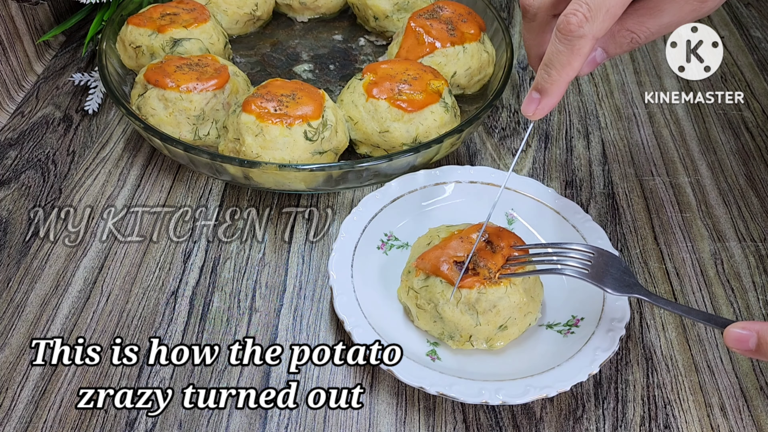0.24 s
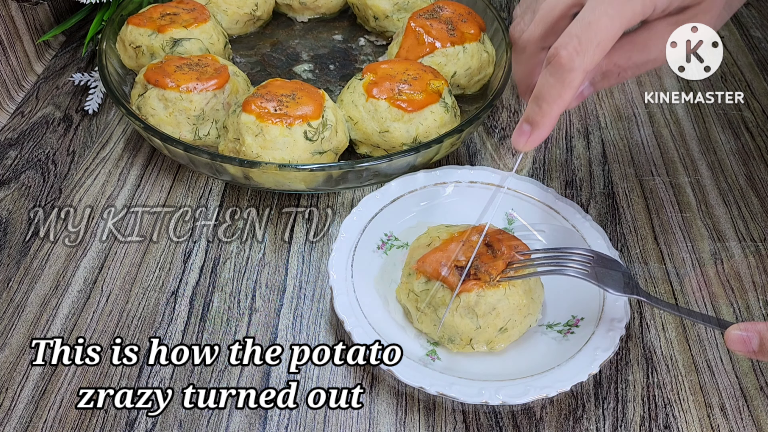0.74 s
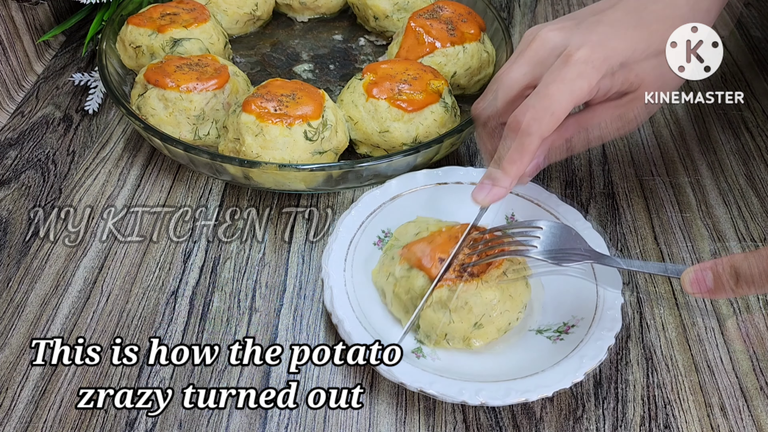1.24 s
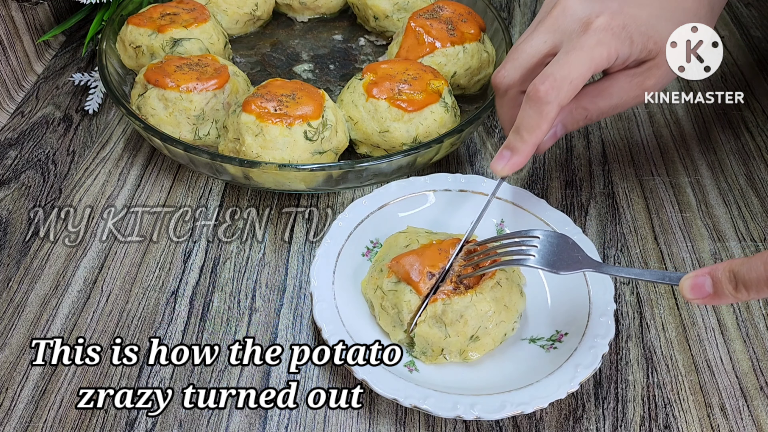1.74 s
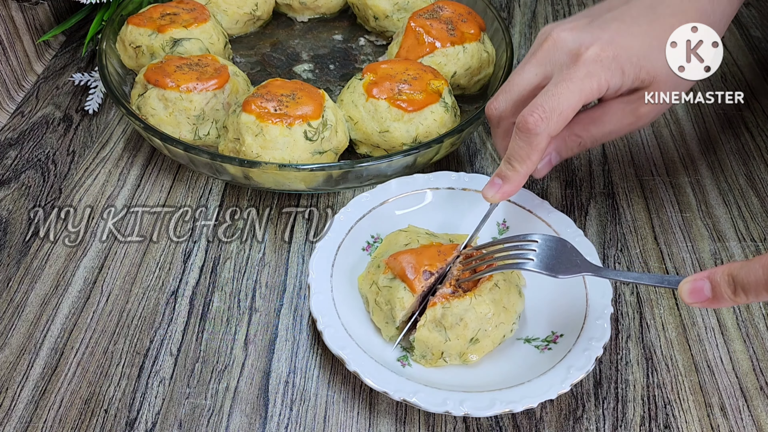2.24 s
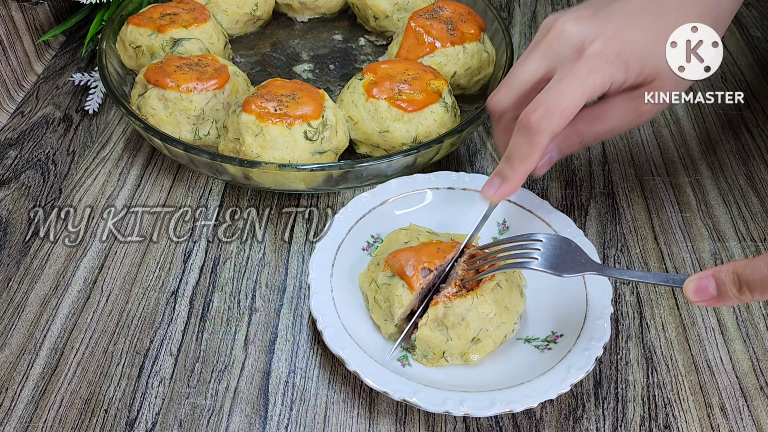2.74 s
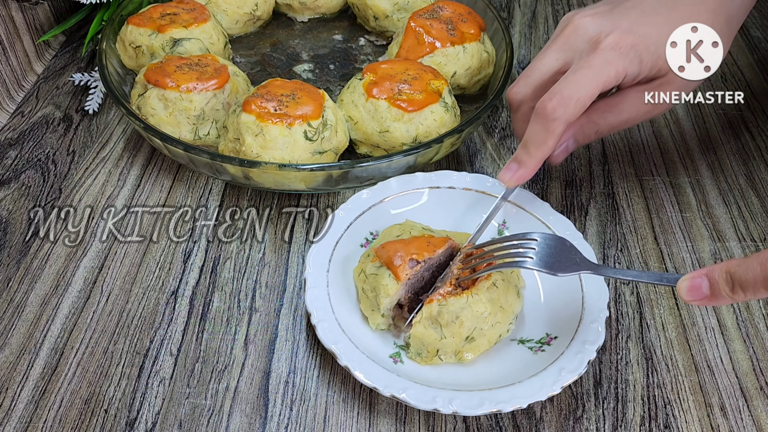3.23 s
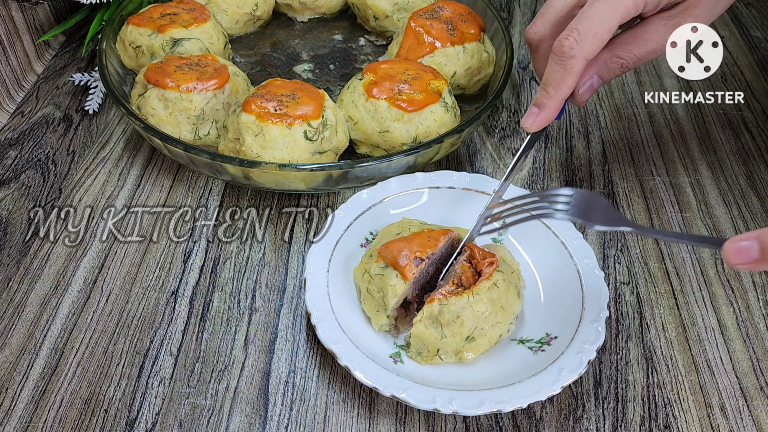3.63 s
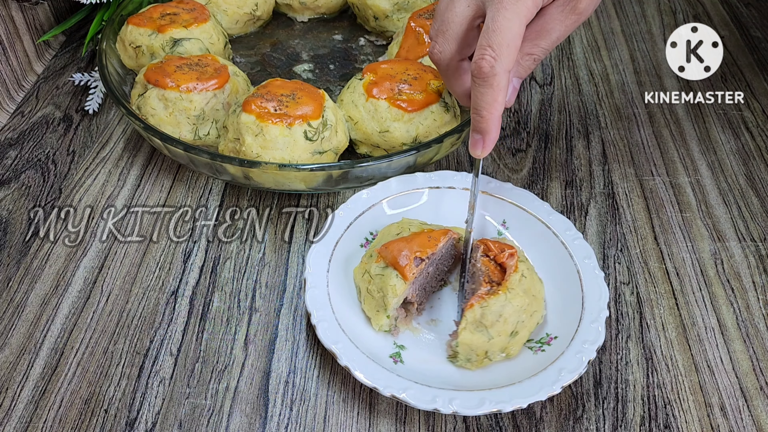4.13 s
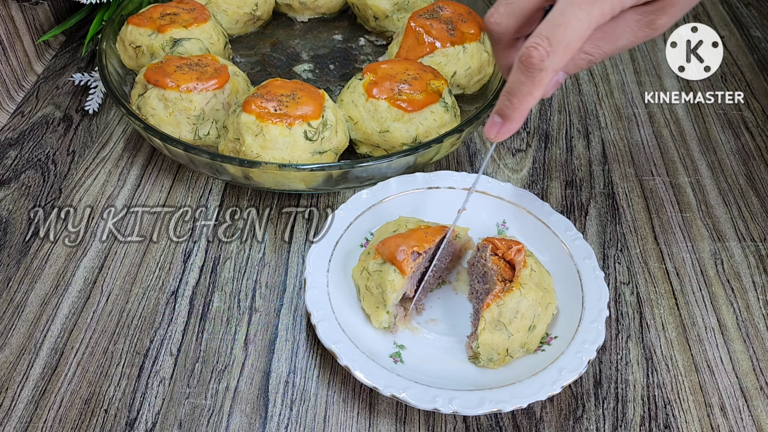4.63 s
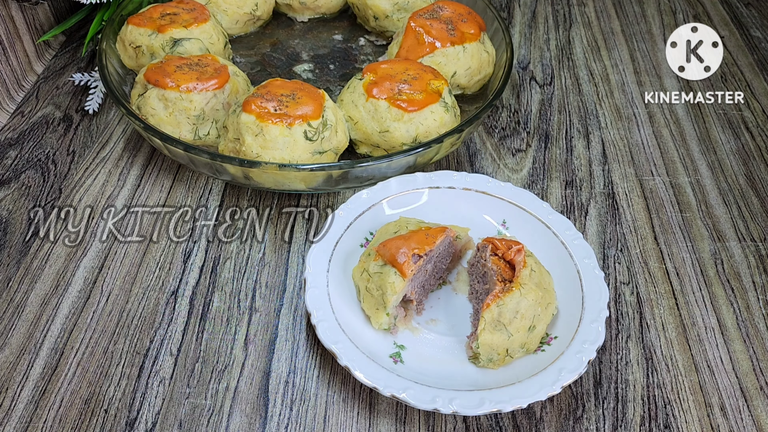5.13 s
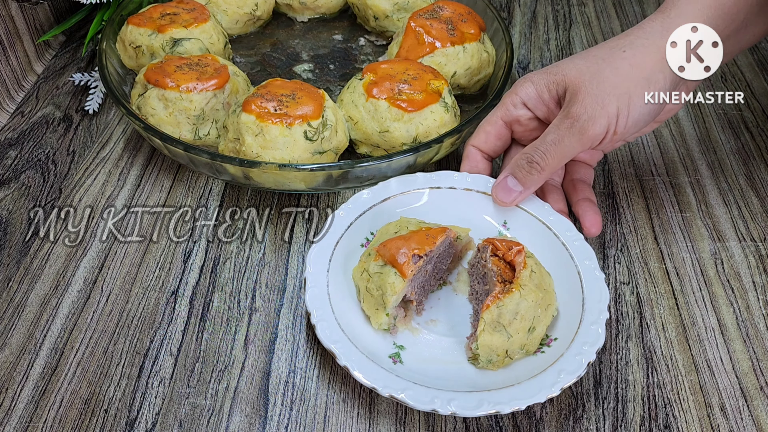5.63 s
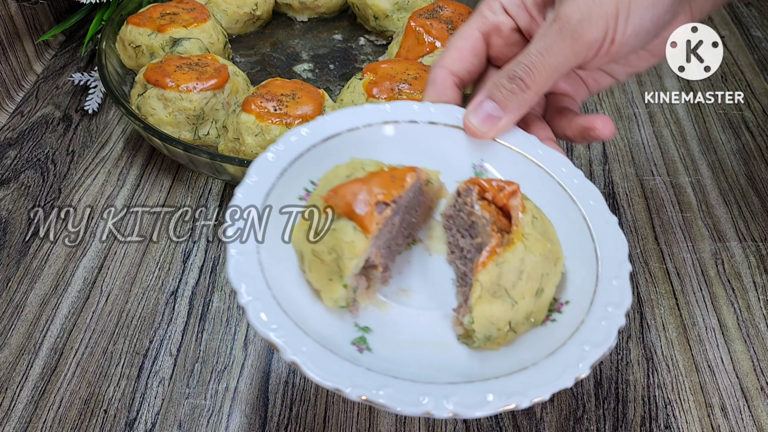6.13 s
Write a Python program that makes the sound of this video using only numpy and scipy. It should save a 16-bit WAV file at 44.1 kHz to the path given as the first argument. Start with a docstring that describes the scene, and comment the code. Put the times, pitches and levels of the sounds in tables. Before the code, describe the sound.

Light sawing grows into gritty scrapes and sharp cutlery clatter on a china plate, then fades to soft rustling and dull bumps over faint hum.

```python
"""In a kitchen, a serrated knife saws through a soft dumpling on a porcelain plate while a fork holds it.
The blade strikes with noise bursts and ringing modes, and skids as grit noise chattering with its teeth.
The plate's foot grinds through a moving resonance and knocks on a hollow table, driven by random jolts.
A low hum wavers in the room noise; at the end a hand pulls the plate away with a soft rustle and dull bumps.
Two spaced microphones listen from above."""
import sys
import numpy as np
from scipy import signal
from scipy.fft import rfft, irfft
from scipy.io import wavfile
from scipy.ndimage import uniform_filter1d

SR = 44100
rng = np.random.default_rng(int(sys.argv[2]) if len(sys.argv) > 2 else 0)


def log_audio(samples):
    """Write samples as a 16-bit WAV file to the path given in sys.argv[1]."""
    # one column per channel
    frames = np.atleast_2d(samples).T
    # limit to full scale, then quantise
    limited = np.clip(frames, -1, 1)
    pcm = np.round(limited * 32767).astype(np.int16)
    wavfile.write(sys.argv[1], SR, pcm)


def gain_from_db(level_db):
    """Convert decibel levels to linear amplitude factors (20 dB per decade)."""
    decades = np.asarray(level_db, float) / 20
    return 10 ** decades


N = 280917  # length in samples
TIME = np.arange(N) / SR  # [s]
RING_TIME = np.arange(SR // 5) / SR  # [s]


def evened(x):
    """Scales to rms 1."""
    return x / np.sqrt(np.mean(x ** 2) + 1e-20)


def read(points, hz):
    """Reads a table on a log-frequency axis."""
    f, value = np.transpose(points)
    return np.interp(np.log(hz + 1), np.log(f + 1), value)


def colour(x, points):
    """Shapes a sound by a spectrum in dB."""
    hz = np.fft.rfftfreq(x.shape[-1], 1 / SR)
    return irfft(rfft(x) * gain_from_db(read(points, hz)), x.shape[-1])


def halves(x):
    """Splits a sound into its lower and upper part, each of rms 1."""
    low = colour(x, [(4200, 0), (6000, -6), (9000, -30)])
    return evened(low), evened(x - low)


def add(mix, s, sound):
    """Mixes a sound in at a time in seconds."""
    part = mix[round(s * SR):][:len(sound)]
    part += sound[:len(part)]


def ring(modes, flutter=0):
    """Decaying sines; fingers and food touching the body make each mode wander in phase and strength."""
    steps = rng.standard_normal((2, len(modes), len(RING_TIME) // 64 + 1))
    wander = np.cumsum(steps, 2).repeat(64, 2)[..., :len(RING_TIME)]
    wander = flutter * uniform_filter1d(wander, 128)
    out = 0
    for (hz, db, t60), swell_db, slip in zip(modes, *wander):
        fade = gain_from_db(db - 60 * RING_TIME / t60 + swell_db)
        out = out + fade * np.sin(2 * np.pi * hz * RING_TIME + slip)
    return out


# uneven waking of the modes, since each blow lands elsewhere [dB, standard deviation]
STRUCK_SPREAD_DB = 4


def struck(modes, flutter):
    """The modes of a body, each a little stronger or weaker for this blow."""
    shifts_db = STRUCK_SPREAD_DB * rng.uniform(-np.sqrt(3), np.sqrt(3), len(modes))
    shifted = [(hz, db + shift_db, t60) for (hz, db, t60), shift_db in zip(modes, shifts_db)]
    return ring(shifted, flutter)


def resonate(x, hz, width):
    """Shifts the curve hz down to zero, smooths, and shifts back: a moving resonance of rms 1."""
    turn = np.exp(2j * np.pi * np.cumsum(hz) / SR)
    r = np.exp(-np.pi * width / SR)
    return evened((turn * signal.lfilter([1], [1, -r], x / turn)).real)


def banded(x, depth_db):
    """As the point of contact travels, narrow bands of the sound swell and sink."""
    z = signal.stft(x, nperseg=512, noverlap=384)[2]
    bands = rng.standard_normal(z.T.shape).T
    bands = evened(uniform_filter1d(uniform_filter1d(bands, 4, 0), 30, 1))
    return evened(signal.istft(z * gain_from_db(depth_db * bands), nperseg=512, noverlap=384)[1][:N])


# spectrum of the room noise: (frequency [Hz], relative level [dB]), and its overall level
AIR = [(15, -42.5), (25, -13), (59, 0), (84, -9), (120, -20.5), (190, -13), (301, -12), (394, -26),
       (695, -41), (911, -26), (1610, -27), (3920, -41), (6380, -47), (11600, -42.5), (16000, -57.5)]
AIR_DB = -63.5
# left-right likeness of the room noise: (frequency [Hz], correlation)
SAME = [(60, 0.68), (240, 0.51), (950, -0.16), (3770, -0.54), (15000, -0.01)]
# low hum: (frequency [Hz], width of its wavering [Hz], level [dB])
HUM = [(69, 5, -62)]


def air():
    """Room air and microphone hiss in faint patches, with a wavering low hum."""
    frames, hz = N // 512 + 5, np.fft.rfftfreq(2048, 1 / SR)
    a, b, c, d, patches = rng.standard_normal((frames, 1025, 5)).T
    patches = evened(uniform_filter1d(uniform_filter1d(patches, 30, 0), 8, 1))
    same = np.clip(read(SAME, hz), -1, 1)[:, None]
    left = a + 1j * b
    right = same * left + np.sqrt(1 - same ** 2) * (c + 1j * d)
    z = np.array([left, right]) * gain_from_db(read(AIR, hz)[:, None] + 2.2 * patches)
    out = gain_from_db(AIR_DB) * evened(signal.istft(z, nperseg=2048, noverlap=1536)[1][:, :N])
    for f, width, db in HUM:
        r = np.exp(-np.pi * width / SR)
        noise = rng.standard_normal(N) + 1j * rng.standard_normal(N)
        drift = signal.lfilter([1], [1, -r], noise)
        tone = (1 + .5 * drift / np.std(drift)) * np.exp(2j * np.pi * f * TIME)
        out += gain_from_db(db) * evened(tone.real)
    return out


# spectrum of a snap: (frequency [Hz], density [dB per Hz])
CRACK = [(710, -35.5), (1200, -8), (2300, -2), (2510, -18.5), (2620, -0.5), (3320, -6.5), (4130, -11),
         (5650, -7.5), (7570, -9.5), (8530, -10), (12600, -8), (14400, -38.5), (16000, -65.5)]


def crack(low_db, high_db, t60):
    """A sharp snap and a splinter of noise, its lower part and its treble set apart."""
    t = np.arange(2048) / SR
    low, high = halves(colour(rng.standard_normal(len(t)), CRACK))
    fade = (1 - np.exp(-t / 0.00058)) * (gain_from_db(-60 * t / t60) + gain_from_db(10.0 - 60 * t / 0.003))
    return (gain_from_db(low_db) * low + gain_from_db(high_db) * high) * fade


# food letting go: (time [s], treble before TICK_DB [dB], middle relative to treble [dB])
TICKS = [(0.388, -45.5, -10.5), (0.572, -58, -26), (0.6495, -52, -15), (0.8106, -52, -7), (0.859, -58, 6.5),
         (0.895, -47.5, -9.5), (1.2, -57, 3), (1.2321, -56, -9), (1.49, -56.5, -16), (2.2209, -61, -35),
         (2.269, -51.5, 1), (2.375, -61, -8), (2.39, -51, -21), (2.466, -55, -10), (2.526, -59, -8),
         (2.6504, -49, -15), (3.028, -58.5, -16), (4.6378, -61, -27), (4.6552, -50, -14.5),
         (5.0335, -44.5, -17.5)]
TICK_DB = -9.5


def ticks():
    """The sticky food lets go of the blade in small snaps of noise."""
    out = np.zeros(N)
    for s, db, dull_db in TICKS:
        add(out, s, crack(db + dull_db + TICK_DB, db + TICK_DB, t60=0.029))
    return out


# modes of the table's legs and of its top: (frequency [Hz], relative level [dB], t60 [s])
LEGS = [(90, 2, 0.28), (108, -5.5, .12)]
TABLE = [(136, -24, 0.19), (188.3, 8, 0.18), (211.7, -0.5, 0.28), (218, -25, 0.072)]
# pushes on the table: (time [s], drive of the top [dB], legs relative to top [dB])
PUSHES = [(0.41, -47.5, -17), (0.49, -59.5, 6), (0.89, -53, -3), (1.17, -54, -0.5), (1.23, -49.5, -5.5),
          (1.38, -47, -21), (1.56, -51.5, -1.8), (1.74, -60, -2.2), (1.85, -49.5, -11.5), (1.9, -46.5, -16),
          (2.0, -49.5, -17.5), (2.065, -41.5, -17), (2.14, -48, -16.5), (2.45, -56, 5), (2.54, -49.5, -4),
          (2.598, -36.5, -6), (2.73, -40, -23), (2.8, -43.5, -5), (2.858, -31.5, -13.5),
          (3.07, -36.5, -14.5), (3.12, -51, -12), (3.26, -36, -13.5), (3.21, -47.5, -15.5),
          (3.37, -44, -13.5), (3.418, -42, -12.5), (3.51, -34.5, -15), (3.9, -41.5, -11), (4.0, -53.5, -15),
          (4.24, -56, -10.5), (4.36, -60, -12.5), (4.75, -57.5, -14), (4.88, -62.5, 3.5), (5.44, -54.5, 1),
          (5.77, -49, -31)]
PUSH_RISE_DB_PER_S, PUSH_FALL_DB_PER_S = 420.5, 228
TREMBLE_DB, TREMBLE_LEGS_DB = -62.5, -72.5  # the table never rests


def shakes():
    """The push of the hands jolts the table top and its legs in uneven lumps."""
    t = np.arange(0, N, 64) / SR
    s, top_db, legs_db = np.transpose(PUSHES)
    away = t - s[:, None]
    slope_db = np.where(away < 0, away * PUSH_RISE_DB_PER_S, -away * PUSH_FALL_DB_PER_S)
    power = gain_from_db(slope_db) ** 2
    top_gain = np.sqrt(gain_from_db(top_db) ** 2 @ power + gain_from_db(TREMBLE_DB) ** 2)
    legs_gain = np.sqrt(gain_from_db(top_db + legs_db) ** 2 @ power + gain_from_db(TREMBLE_LEGS_DB) ** 2)
    # about 150 lumps a second over a weak steady noise
    jolts = rng.standard_normal((2, N)) * (0.09 + (rng.random((2, N)) < 150 / SR))
    top = evened(signal.oaconvolve(jolts[0], ring(TABLE))[:N])
    legs = evened(signal.oaconvolve(jolts[1], ring(LEGS))[:N])
    return np.interp(TIME, t, top_gain) * top + np.interp(TIME, t, legs_gain) * legs


EDGE_DB, ROUNDNESS = -30.5, 1.3  # sunk this far after a rise or fall time; 1 = pointed top, 2 = round


def swells(rows):
    """One gain curve a row: it rises to its peak and sinks away."""
    t = np.arange(0, N, 16) / SR
    s, rise, fall, db = (c[:, None] for c in np.transpose(rows)[:4])
    away = np.where(t < s, (s - t) / rise, (t - s) / fall)
    return t, gain_from_db(db + EDGE_DB * np.minimum(away, 9) ** ROUNDNESS)


TEETH_PER_S = 83  # on average


def grit():
    """Two streams of rough noise, both chattering with the teeth of the blade."""
    pace = TEETH_PER_S * (1 + 4 * uniform_filter1d(rng.standard_normal(N), 1000))
    teeth = .5 + np.exp(-(np.cumsum(pace) / SR % 1) / 1.2)  # each tooth catches, then slides
    grains = gain_from_db(2.5 * np.minimum(rng.exponential(1.2, (2, N)), 6))
    return teeth * grains * rng.standard_normal((2, N))


# modes of blade, plate and fork: (frequency [Hz], relative level [dB], t60 [s])
BLADE = [(1950, -12, .05), (3885, -8, .13), (6365, 0, .07), (6310, -11, .13), (9345, 0, .05),
         (9250, -14, .1), (12680, -9, .06)]
PLATE = [(603, -6, .14), (1110, 0, .11), (1723, -1, .11), (2500, -1, .13), (3100, -12, .1), (4125, -1, .11),
         (4260, -4, .1), (5620, -8, .06), (7170, -12, .05), (8070, -13, .04), (8820, -16, .05),
         (10570, -17, .05), (11670, -14, .04), (12500, -18, .04)]
FORK = [(2660, -9, .04), (2900, -3, .045), (3068, -3, .045), (3220, -2, .045), (3360, 0, .05),
        (3525, -4, .045), (3765, -7, .04), (5490, -8, .035), (5850, -6, .035), (6090, -8, .035)]
# spectrum of the skidding: (frequency [Hz], density [dB per Hz])
HISS = [(880, -38), (1500, -6.5), (1660, -23), (2160, -3.5), (2590, -12.5), (2800, -8.5), (3310, -7.5),
        (4550, -11), (5280, -4.5), (5880, -8), (11100, -10.5), (14600, -11.5), (16000, -41.5)]
# skids: (peak time [s], rise [s], fall [s], hiss level [dB], treble relative to hiss [dB])
SKIDS = [(0.808, 0.0072, 0.21, -77.5, 1.5), (1.12, .03, 0.15, -79.5, 1), (1.27, 0.24, 0.089, -74.5, -1.5),
         (1.556, 0.059, 0.15, -65.5, -1.7), (1.605, 0.082, 0.018, -62, -25), (1.69, 0.034, 0.092, -78, 2),
         (1.82, 0.029, 0.22, -80, -1), (1.9, 0.065, 0.03, -68, -7), (1.981, .004, .06, -59.5, -0.5),
         (2.015, 0.08, 0.088, -61, -6), (2.14, 0.045, .12, -71, 10), (2.178, 0.13, .025, -58.5, -8.5),
         (2.275, .005, 0.026, -77, 8), (2.3, 0.09, 0.32, -85, 12), (2.46, .08, .02, -89, 12),
         (2.578, 0.035, .035, -54.5, -3.5), (2.66, 0.018, 0.0946, -72.5, 8), (2.71, 0.081, 0.066, -67, 0.1),
         (2.792, .003, .02, -59.5, 7.5), (2.83, 0.062, 0.048, -51, 0.4), (2.92, 0.089, .09, -66, -5.5),
         (2.98, 0.12, 0.063, -77, 12.5), (3.05, 0.043, 0.059, -79.5, 12), (3.076, 0.044, .08, -67, 1.7),
         (3.175, 0.057, .1, -69.5, 10.5), (3.23, 0.071, .02, -53, -3), (3.285, 0.053, .05, -46, -8.5),
         (3.42, 0.0057, 0.015, -43.5, -0.46), (3.46, .15, .06, -47, -2.75), (3.51, .005, .045, -27, -2),
         (3.58, .1, .05, -68.5, -7), (3.919, .015, 0.058, -46, -7), (4.067, 0.083, 0.2, -45, -3),
         (4.205, 0.017, 0.153, -50.5, -0.8), (4.264, .12, 0.063, -51, 4.5),
         (4.351, 0.083, 0.066, -71.5, 3.5), (4.46, 0.041, 0.25, -75, -21.5), (4.77, 0.066, 0.17, -70, -24),
         (4.882, .06, 0.0097, -65.5, -27)]
# resonance of the free length of blade: (time [s], frequency [Hz])
FREE_BLADE = [(0.8, 3700), (1.1, 2700), (1.6, 2400), (1.9, 4900), (2.0, 3000), (2.18, 2430), (2.58, 4500),
              (2.74, 2500), (2.83, 4900), (2.93, 3600), (3.2, 2430), (3.29, 2460), (3.45, 3500),
              (3.55, 3400), (3.92, 4100), (4.1, 4900), (4.3, 4300), (4.45, 2375), (4.62, 2300), (4.8, 2772)]


def skids(rough):
    """The blade skids on the glaze: grit hisses, the free blade colours it, and blade, plate and fork sing."""
    t, skid = swells(SKIDS)
    hiss_gain = np.interp(TIME, t, np.sqrt((skid ** 2).sum(0)))
    treble_db = np.transpose(SKIDS)[4]
    treble_gain = np.interp(TIME, t, np.sqrt(gain_from_db(treble_db) ** 2 @ skid ** 2))
    low, high = halves(banded(colour(rough, HISS), depth_db=4))
    blade_hz = np.interp(TIME, *np.transpose(FREE_BLADE))
    low = evened(low + gain_from_db(1.5) * resonate(low, blade_hz, 350))
    bodies = ring(PLATE + BLADE + FORK, flutter=0.23)
    singing = signal.oaconvolve(rough * hiss_gain, bodies)[:N] / np.linalg.norm(bodies)
    return hiss_gain * low + treble_gain * high + gain_from_db(-16) * singing


# modes of the plate on its foot: (frequency [Hz], relative level [dB], t60 [s])
CLACK = [(551, -0.5, 0.14), (723, 4.5, 0.082), (963, 8.5, 0.013), (1246, 11, 0.013), (1505, 3.5, 0.033),
         (1860, -3.5, 0.013)]
# grinds of the foot: (peak time [s], rise [s], fall [s], level [dB], resonance [Hz])
GRINDS = [(0.808, .006, .055, -70.5, 1176), (0.908, 0.18, .08, -71, 1037), (1.12, 0.025, .035, -67.5, 952),
          (1.164, 0.0027, .024, -49, 977), (1.28, 0.39, .03, -67, 1048), (1.55, 0.014, .15, -55.5, 900),
          (1.6, 0.29, .025, -52, 829), (1.7, 0.021, .08, -68, 1050), (1.845, 0.041, .15, -63, 1142),
          (1.9, 0.055, .03, -60.5, 750), (2.018, 0.056, .055, -44.5, 700), (2.1, 0.045, .12, -58, 692),
          (2.178, 0.062, .025, -46.5, 1130), (2.275, 0.0063, .008, -61, 1190), (2.409, 0.057, .1, -68, 695),
          (2.542, .008, .08, -66, 948), (2.59, 0.069, .05, -53, 984), (2.697, 0.034, .1, -51, 1142),
          (2.797, 0.0068, .12, -46.5, 1110), (2.94, 0.079, .07, -52.5, 750),
          (3.07, 0.0065, .05, -45.5, 793), (3.205, 0.029, .12, -46, 725), (3.288, .04, .03, -39.5, 999),
          (3.42, .005, .012, -42, 917), (3.45, 0.069, .1, -63.5, 910), (3.53, .06, .03, -40.5, 635),
          (3.6, 0.15, .04, -60, 720), (3.96, 0.083, .012, -44, 740), (4.04, 0.025, .15, -43.5, 890),
          (4.15, 0.15, .05, -49.5, 760), (4.21, .04, .1, -55, 627), (4.265, .1, .1, -54, 980),
          (4.365, .1, .025, -65.5, 1130), (4.45, 0.07, .02, -70.5, 856), (4.764, .1, .12, -71.5, 903),
          (4.882, .1, .027, -74, 895), (5.446, 0.0081, .15, -71, 817), (5.746, 0.039, .04, -62.5, 580),
          (5.8, .06, 0.06, -57.5, 470)]


def grinds(rough):
    """The plate's foot grinds on the table; its tilt moves a resonance through the noise."""
    t, grind = swells(GRINDS)
    power = grind ** 2 + 1e-14
    gain = np.interp(TIME, t, np.sqrt(power.sum(0)))
    # louder strokes weigh more in the pitch
    hz = np.interp(TIME, t, np.transpose(GRINDS)[4] @ power / power.sum(0))
    foot = ring(CLACK) * gain_from_db(-60 * RING_TIME / 0.019)  # the sliding foot is damped harder
    rub = evened(signal.oaconvolve(rough, foot)[:N])
    return gain * evened(rub + gain_from_db(1.5) * resonate(rub, hz, 130))


# how strongly each part answers a blow, added to the blow's own levels
CRACK_DB, TREBLE_DB, CLACK_DB, THUMP_DB = -10, -4.5, -10.5, -19


def blow(out, low, s, crack_db, treble_db, clack_db, blade_db, partner_db, partner):
    """Crack, clack of the plate on its foot, blade and struck partner ringing, and a thump in the table."""
    add(out, s, crack(crack_db + CRACK_DB, treble_db + TREBLE_DB, t60=0.037))
    add(out, s, gain_from_db(clack_db + CLACK_DB) * struck(CLACK, flutter=0.36))
    add(out, s, gain_from_db(blade_db) * struck(BLADE, flutter=0.25))
    add(out, s, gain_from_db(partner_db) * struck(partner, flutter=.4))
    thump = ring(TABLE) * (1 - np.exp(-RING_TIME / .004))  # the heavy top starts slowly
    add(low, s, gain_from_db(clack_db + THUMP_DB) * thump)


# knocks: (time [s], clack [dB], crack relative to clack [dB], treble relative to clack [dB])
KNOCKS = [(1.1647, -49.5, 0, -24), (1.8957, -53, 0.5, -5.5), (2.5621, -49, 1, -1), (2.5728, -49, -6, -5),
          (2.584, -50, 3, 2), (2.5953, -51, -1, 2.5), (2.6936, -74, 8, -4), (2.7326, -47.5, -2.5, -3),
          (2.7946, -51.5, 5, -14), (2.8744, -42, -6, -23), (3.0682, -50, -8, -14.5),
          (3.1044, -46.5, -10.5, -9), (5.4445, -59.5, 4.2, -13)]
KNOCK_RING_DB = -26.5  # ring of the plate, relative to the clack


def knocks(out, low):
    """The plate rocks and knocks on its foot, the blade as good as silent."""
    for s, db, crack_db, treble_db in KNOCKS:
        blow(out, low, s, db + crack_db, db + treble_db, db, -120, db + KNOCK_RING_DB, PLATE)


# knife against fork: (time [s], strength [dB], and relative to it treble [dB], clack [dB], tine ring [dB])
FORK_BLOWS = [(1.296, -29, -3.5, -8.5, -15.5), (3.3619, -26, -8.5, -7.5, -15),
              (3.4092, -24, -5.5, -8, -13.5), (3.4129, -32.5, -10, -7.5, -21), (3.4527, -33, 0.5, -21, -14),
              (3.491, -26.5, -4, -18.5, -24.5), (3.4964, -19, 1.5, -12.5, -8.5),
              (3.5082, -26, -14, -13, -5.5), (3.5203, -29, -18.5, -6.5, -11), (3.539, -24, -8.5, -14.5, -8),
              (3.5427, -33, -6.5, -12, -14.5), (3.5954, -45, -22, -5.5, -21)]
FORK_BLADE_DB = -21  # ring of the blade against the fork, relative to the blow


def fork_blows(out, low):
    """The blade strikes the fork and both ring."""
    for s, db, treble_db, clack_db, tine_db in FORK_BLOWS:
        blow(out, low, s, db, db + treble_db, db + clack_db, db + FORK_BLADE_DB, db + tine_db, FORK)


# knife on plate: (time [s], strength [dB], treble relative to it [dB], clack relative to it [dB],
# blade ring over plate ring [dB])
KNIFE_BLOWS = [(1.3661, -22, -16, -6.5, -9.5), (2.0513, -20, -46, -4.5, -6.5),
               (2.8519, -14.5, -17, -6, 18.5), (3.2408, -16, -28, -10, -10.5), (3.245, -10, -43, -7.5, 3.5),
               (3.2811, -21, -14.5, -15, 3), (3.894, -25.5, -10.5, -5, -2.5), (3.898, -27.5, -10, -6, 2),
               (3.922, -31, -14, -6.5, 1), (3.9888, -30.5, -7, -7.5, 0), (4.0203, -41, -0.5, -10, -3)]
KNIFE_RING_DB = -23.5  # blade and plate share this ring, relative to the strength


def knife_blows(out, low):
    """The blade strikes the plate and both ring, leaning to one or the other."""
    for s, db, treble_db, clack_db, lean_db in KNIFE_BLOWS:
        blade_db = db + KNIFE_RING_DB + lean_db / 2
        plate_db = db + KNIFE_RING_DB - lean_db / 2
        blow(out, low, s, db, db + treble_db, db + clack_db, blade_db, plate_db, PLATE)


# knife and hands leave and the plate is lifted: (time [s], level [dB], treble relative to it [dB])
RUSTLE = [(4.39, -110, -2), (4.65, -83.5, -3), (4.83, -73, -6), (4.91, -85.5, 10.5), (5.03, -87, 2.5),
          (5.07, -79, 4), (5.169, -75.5, 10), (5.24, -85, 6), (5.43, -90, -4), (5.446, -76, -1),
          (5.6, -88.5, -3), (5.67, -81.5, -3.5), (5.76, -81.5, -2), (5.9, -74.5, -2), (6.0, -73.5, -2.5),
          (6.14, -74, -3.5), (6.37, -84, -7)]
# spectrum of the rustle: (frequency [Hz], density [dB per Hz])
RUSTLE_TONE = [(900, -33), (1600, -10), (2400, 2), (4500, -3.5), (6500, -10.5), (11500, -9), (14500, -11),
               (16000, -39)]


def rustle():
    """A broad, soft friction noise with fine grain; the plate hums faintly under the fingers."""
    s, level_db, treble_db = np.transpose(RUSTLE)
    grain = gain_from_db(1.5 * np.minimum(rng.exponential(1, N), 5)) * rng.standard_normal(N)
    low, high = halves(banded(colour(grain, RUSTLE_TONE), depth_db=2.5))
    low = low + gain_from_db(-7) * evened(signal.oaconvolve(low, ring(PLATE))[:N])
    low_gain = gain_from_db(np.interp(TIME, s, level_db))
    high_gain = gain_from_db(np.interp(TIME, s, level_db + treble_db))
    return low_gain * low + high_gain * high


# bumps: (time [s], drive [dB])
BUMPS = [(5.742, -62), (5.79, -57.5), (5.807, -59)]
# dull modes of a bump: (frequency [Hz], relative level [dB], t60 [s])
BUMP = [(347, 9, 0.076), (533, 3, 0.13), (710, -16, 0.19), (1130, -21, 0.17), (2094, -3, 0.076),
        (2430, -21, 0.14)]


def bumps():
    """The plate bumps the table as it is lifted and wakes dull modes."""
    out = np.zeros(N)
    for s, db in BUMPS:
        add(out, s, gain_from_db(db) * struck(BUMP, flutter=.4))
    return out


# what the microphones hear unalike: (frequency [Hz], level relative to what they share [dB])
APART = [(60, -18.5), (110, -14.5), (200, -19), (380, -3.5), (700, -4), (1290, -3.5), (2380, 2),
         (4400, 1.5), (8120, -0.5), (15000, 1)]


def microphones(x):
    """Sound arrives by many paths, each earlier at one side; as the hands move, three sets of paths take turns."""
    t, turn, unalike = np.arange(512) / SR, TIME * 6, 0  # six rounds a second
    for k in range(3):
        late = rng.standard_normal(len(t)) * gain_from_db(-60 * t / .015)
        paths = np.concatenate([-late[::-1], [0], late])
        window = np.sqrt(2 / 3) * abs(np.cos(np.pi * (turn + k / 3)))
        unalike = unalike + signal.oaconvolve(x * window, paths / np.linalg.norm(paths), "same")
    unalike = colour(unalike, APART)
    return np.array([x + unalike, x - unalike])


# reverberation: (frequency [Hz], t60 [s])
KITCHEN = [(200, 0.23), (1000, 0.41), (4000, 0.29), (12000, 0.2)]


def kitchen(x):
    """Sparse echoes of random sign, each band dying at its own speed."""
    taps = np.zeros((2, SR // 2))
    starts = np.arange(200, SR // 2 - 20, 20)
    at = starts + rng.integers(0, 20, (2, (SR // 2 - 201) // 20))
    np.put_along_axis(taps, at, rng.choice([-1., 1.], at.shape), 1)
    hz, t, z = signal.stft(taps, SR, nperseg=256)
    tail = signal.istft(z * gain_from_db(-60 * t / read(KITCHEN, hz)[:, None]), SR, nperseg=256)[1]
    return signal.fftconvolve(x[None], tail / np.linalg.norm(tail[0]), axes=1)[:, :N]


def scene():
    """Cutlery above the table with its echoes; the table heard with the same sign on both sides, a little
    louder left than right."""
    blows, thumps = np.zeros((2, N))
    for play in (knocks, fork_blows, knife_blows):
        play(blows, thumps)
    skid_grit, foot_grit = grit()
    cutlery = ticks() + skids(skid_grit) + grinds(foot_grit) + blows + rustle() + bumps()
    table = colour(thumps + shakes(), [(35, -46.5), (55, -15.5), (75, 2)]) * np.array([[.6], [-.6]])
    # the two signs are applied as levels in dB: slightly louder left than right
    table = table / np.array([[.6], [-.6]]) * gain_from_db(np.array([[.6], [-.6]]))
    return microphones(cutlery) + gain_from_db(-16) * kitchen(cutlery) + table + air()


def roll_off(x):
    """The treble ends steeply here."""
    return signal.sosfilt(signal.butter(12, 16500, fs=SR, output="sos"), x)


# frequency response of the microphones: (frequency [Hz], gain [dB])
MICROPHONE = [(25, -20.5), (55, -5), (70, -1.5), (300, -2), (385, -14), (480, -3), (14300, -0.5),
              (16000, -12.5)]


def record(dry):
    """Colours the mix by the microphones' response, its ends mirrored so that they do not wrap round."""
    padded = np.pad(dry, ((0, 0), (4096, 4096)), "reflect")
    heard = colour(padded, MICROPHONE)[:, 4096:-4096]
    return roll_off(heard)


dry = scene()
out = record(dry)
log_audio(out)
```